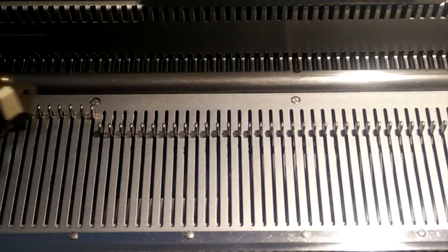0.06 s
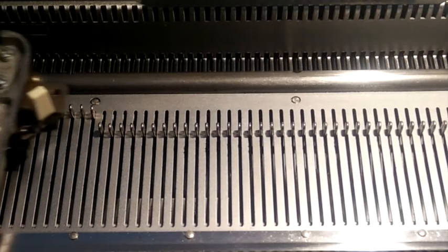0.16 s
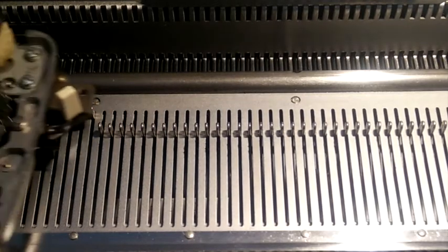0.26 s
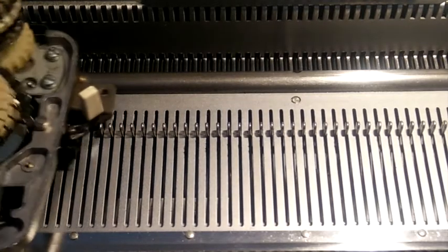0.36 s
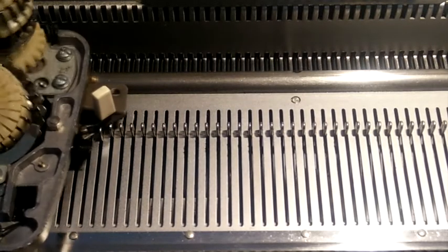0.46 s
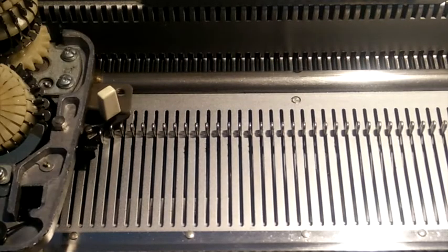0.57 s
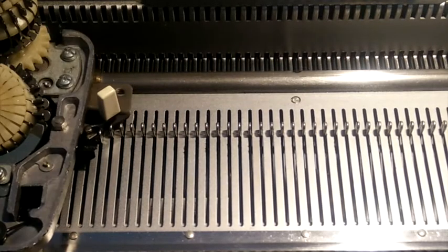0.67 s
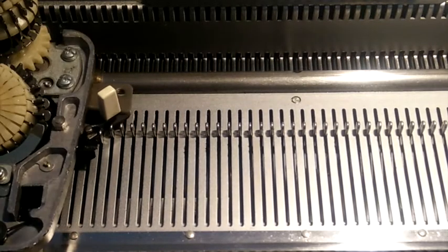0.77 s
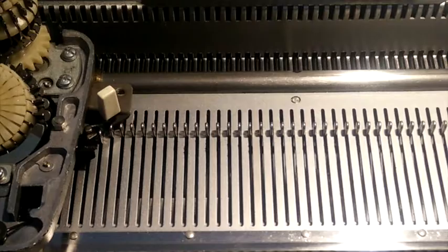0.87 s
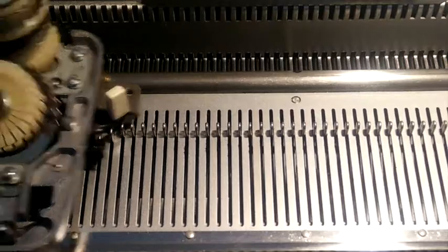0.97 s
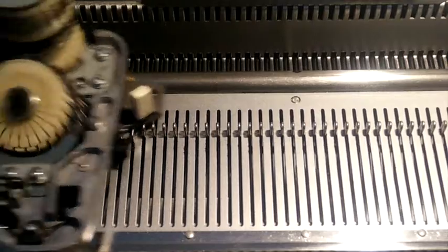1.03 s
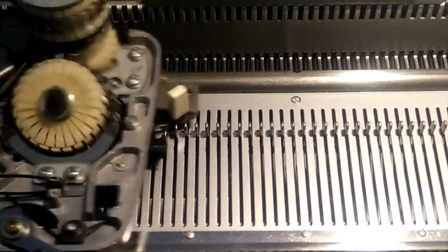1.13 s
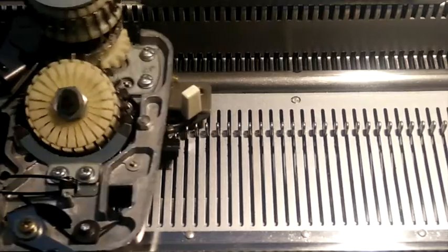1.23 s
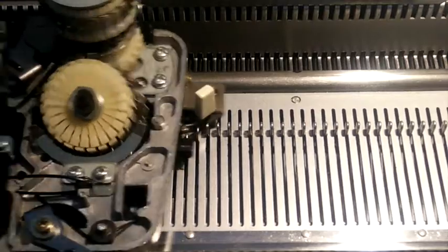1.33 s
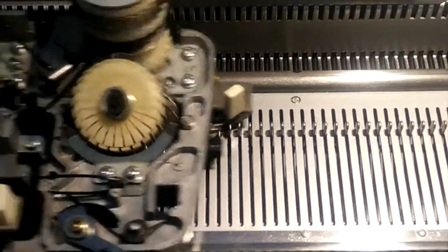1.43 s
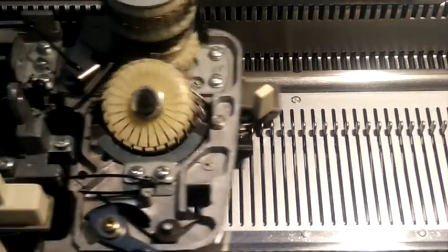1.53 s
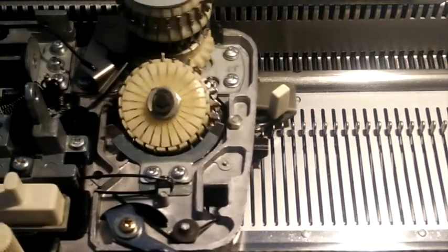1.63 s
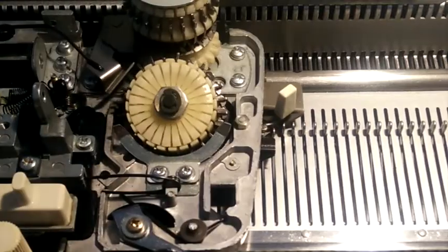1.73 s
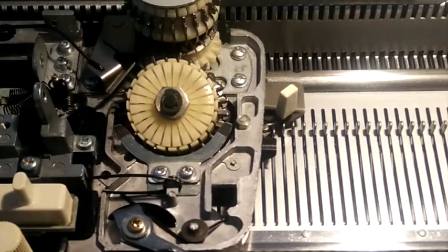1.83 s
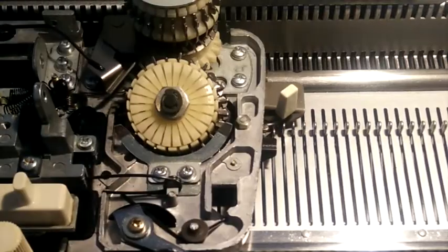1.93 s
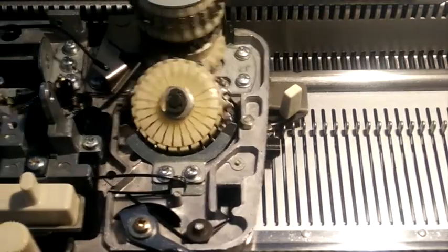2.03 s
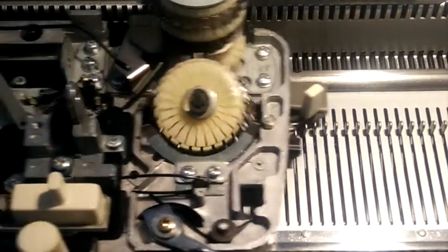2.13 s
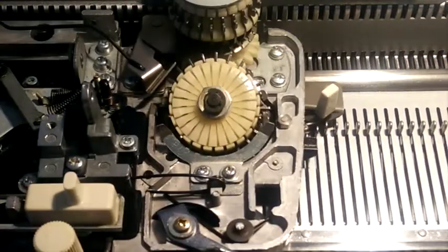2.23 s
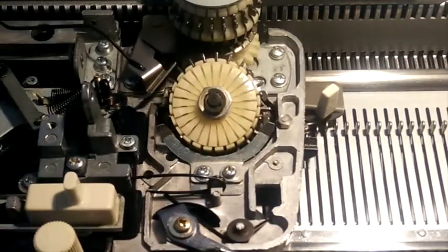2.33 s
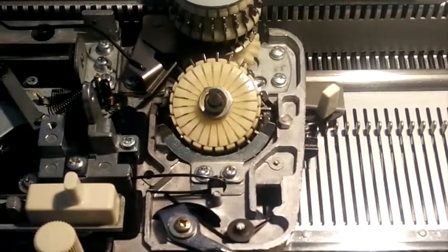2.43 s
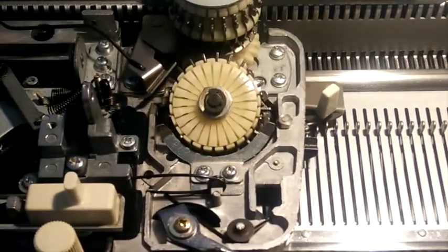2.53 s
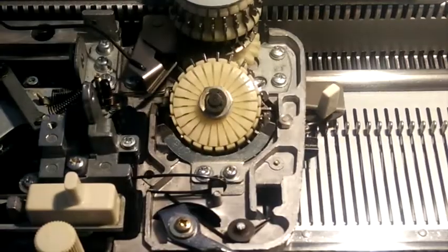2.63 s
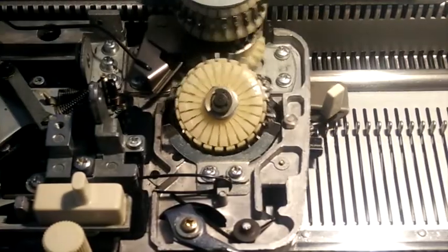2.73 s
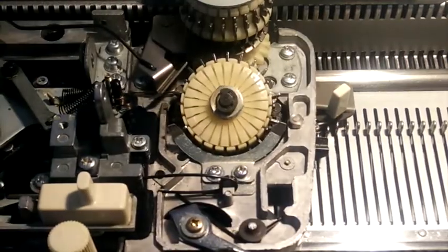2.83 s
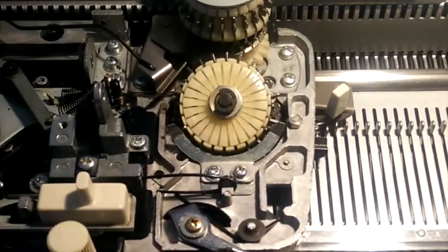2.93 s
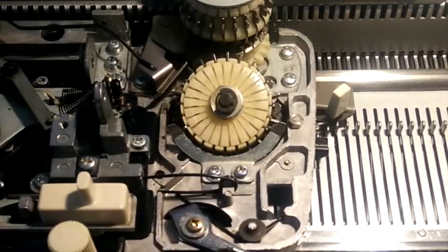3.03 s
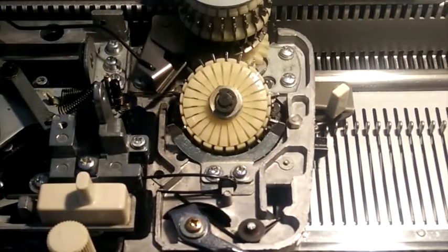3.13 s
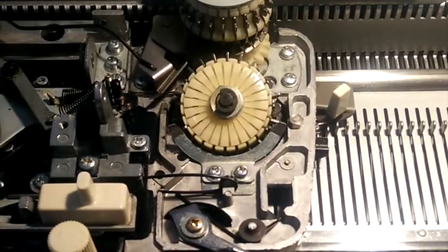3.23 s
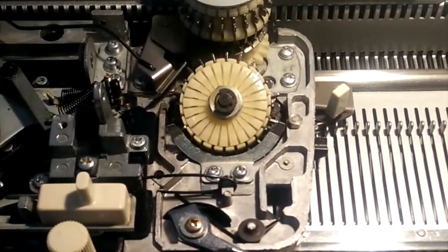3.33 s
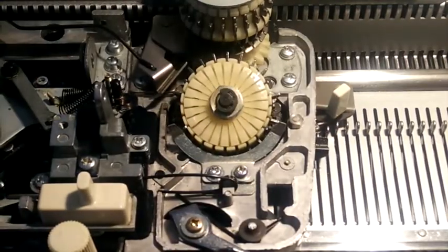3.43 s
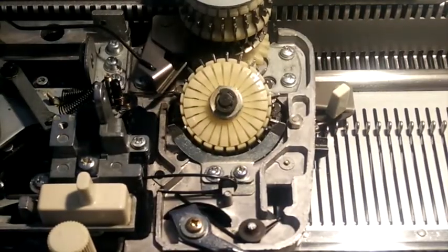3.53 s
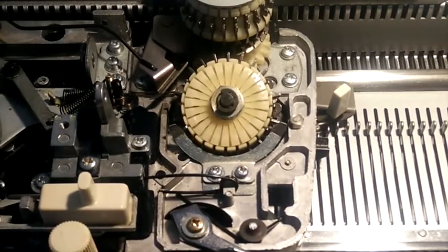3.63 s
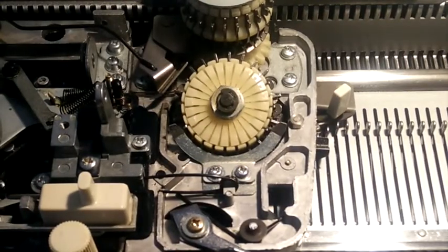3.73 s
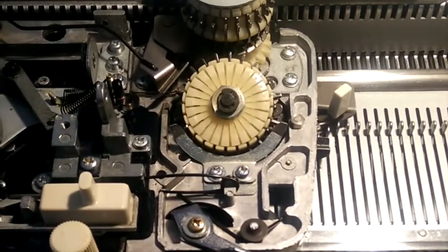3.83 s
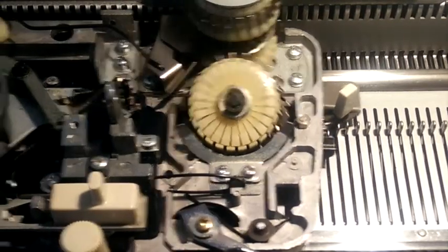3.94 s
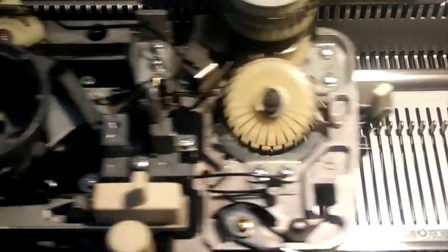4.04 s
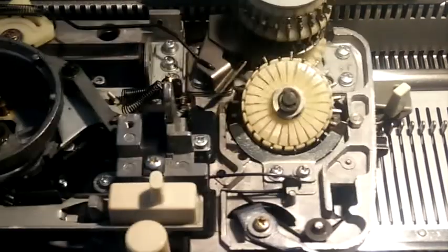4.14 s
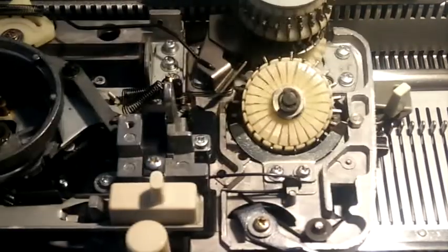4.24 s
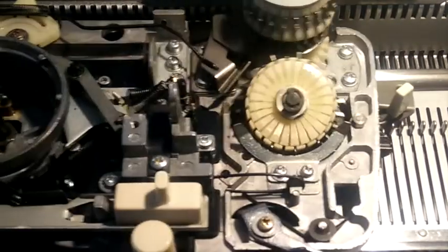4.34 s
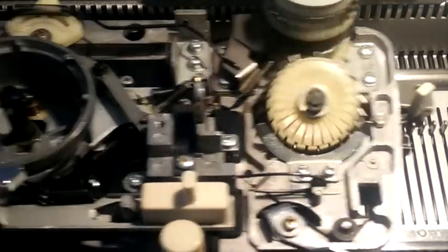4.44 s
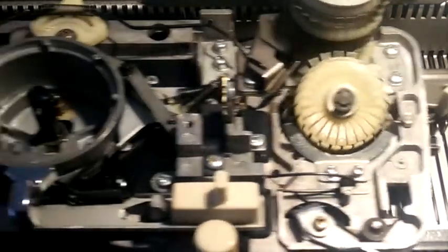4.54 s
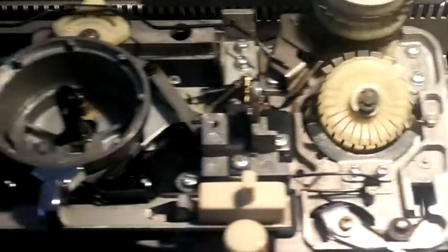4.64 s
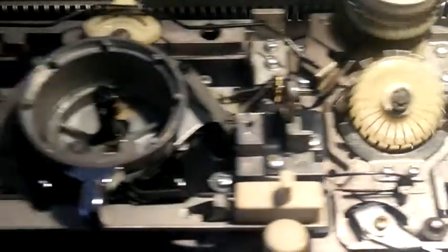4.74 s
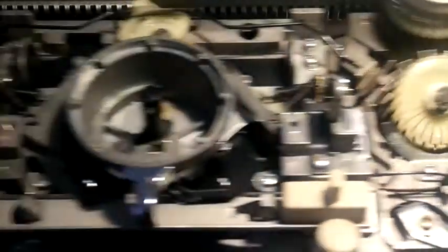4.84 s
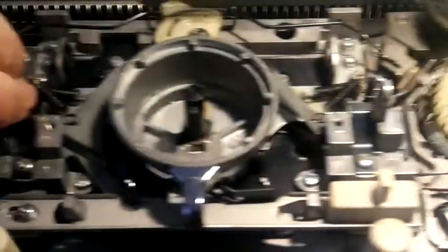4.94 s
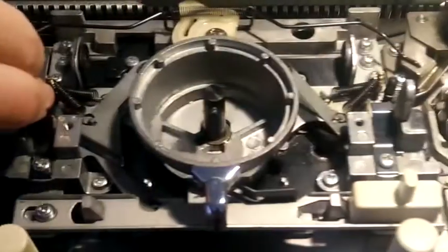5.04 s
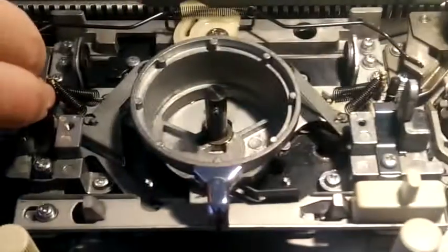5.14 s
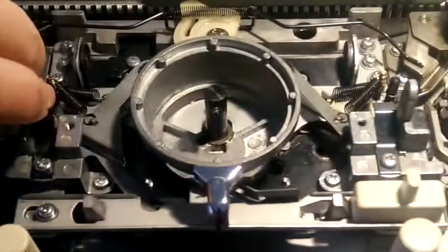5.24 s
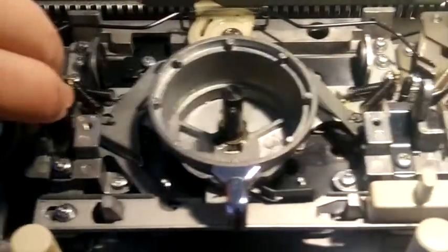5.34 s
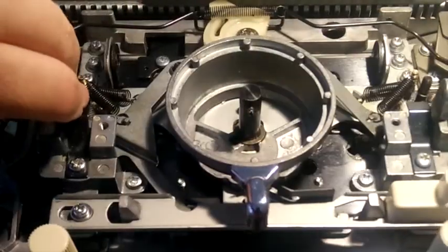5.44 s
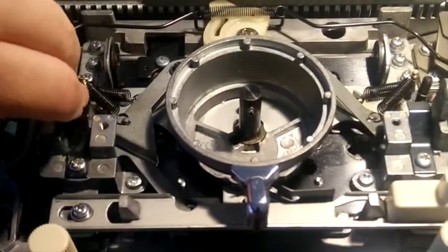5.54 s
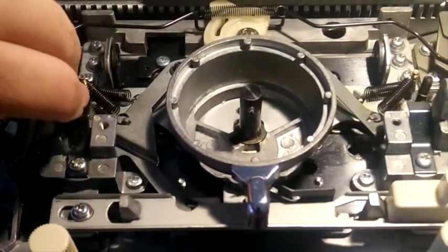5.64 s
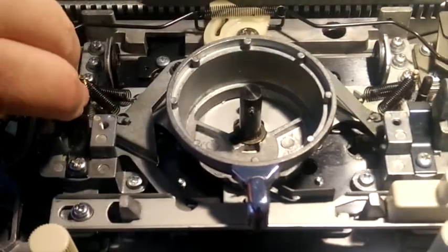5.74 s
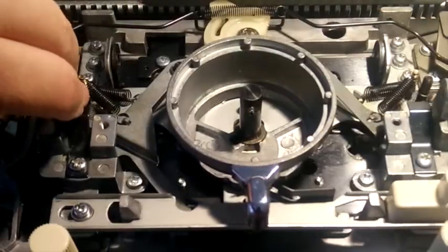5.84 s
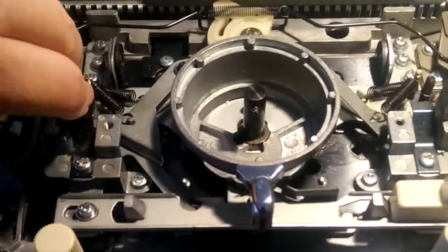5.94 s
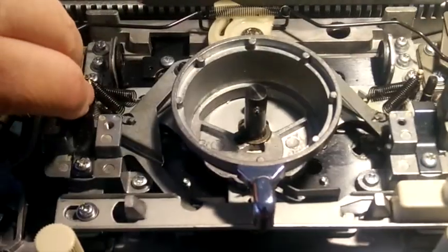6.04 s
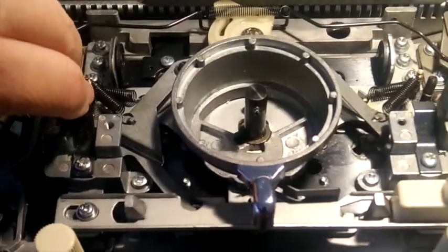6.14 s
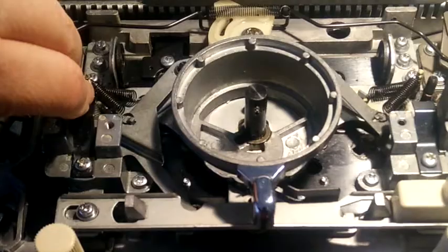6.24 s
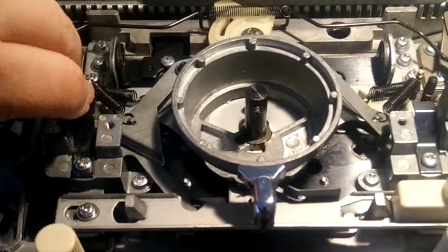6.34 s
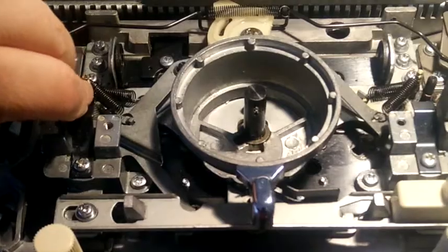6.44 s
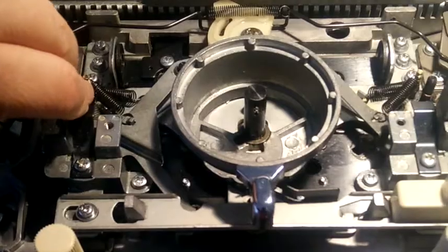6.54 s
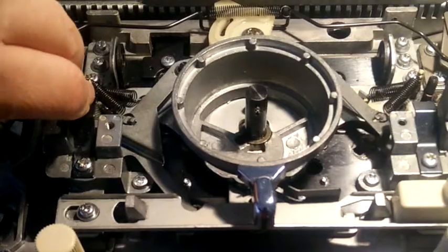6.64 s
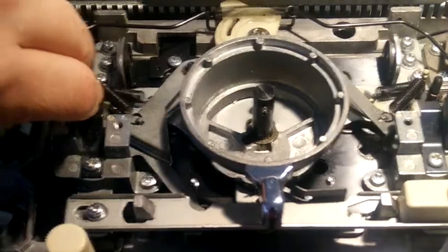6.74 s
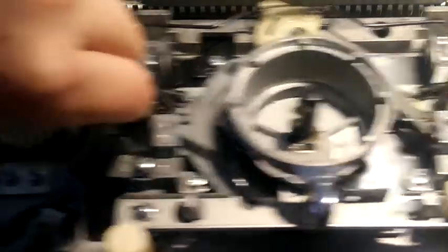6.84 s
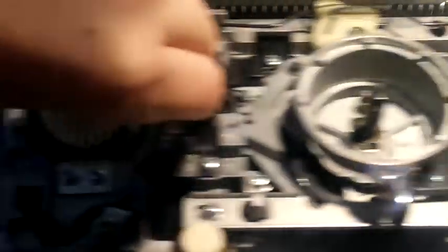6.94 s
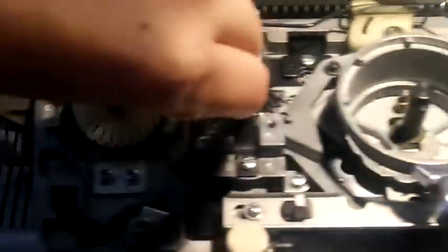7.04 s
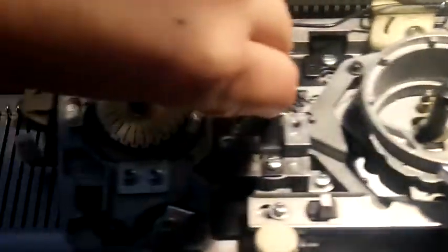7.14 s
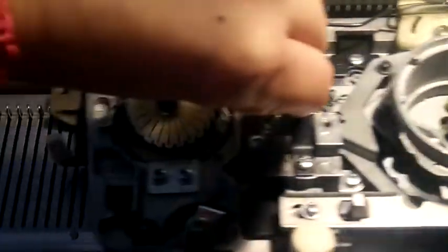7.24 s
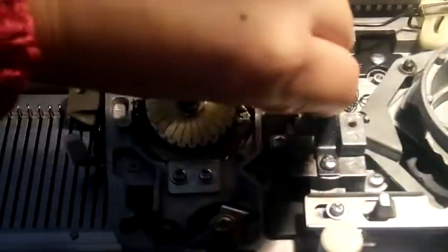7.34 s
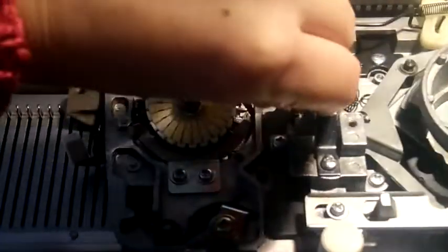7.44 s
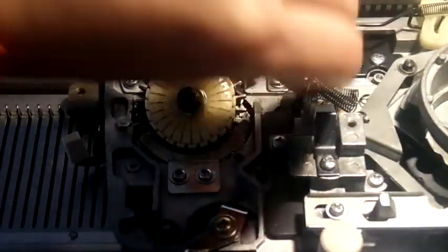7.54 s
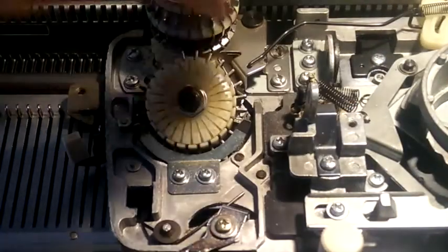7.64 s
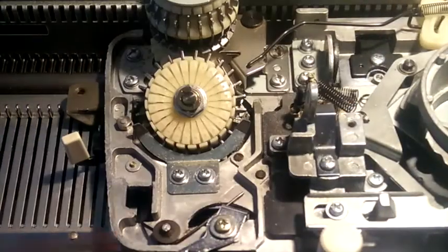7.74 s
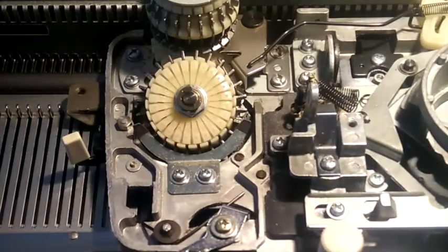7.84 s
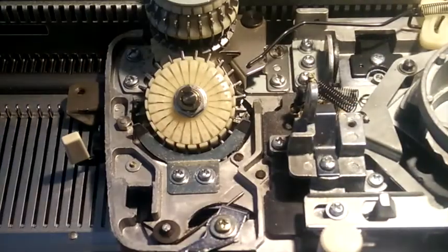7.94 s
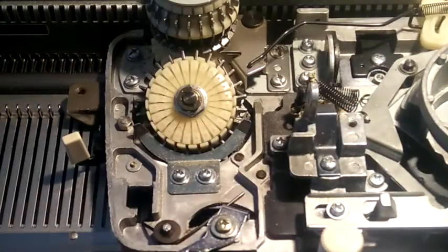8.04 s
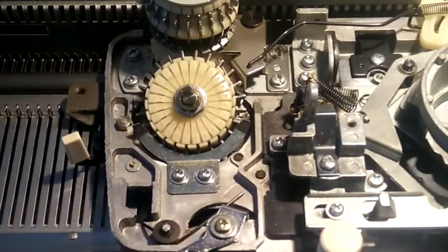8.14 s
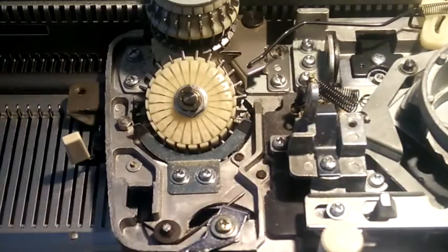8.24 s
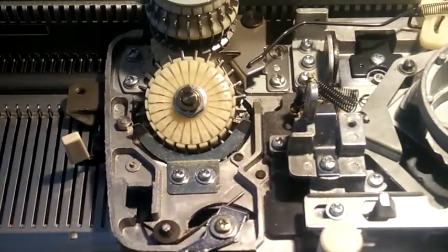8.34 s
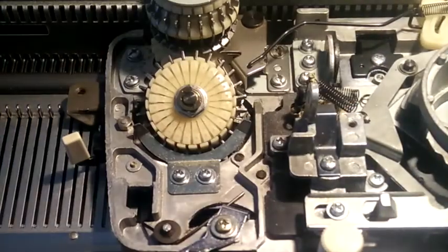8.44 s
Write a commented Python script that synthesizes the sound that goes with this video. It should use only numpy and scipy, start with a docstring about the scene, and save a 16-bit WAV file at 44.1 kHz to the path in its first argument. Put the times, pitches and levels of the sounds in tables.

```python
"""In a small room, a knitting machine carriage is pushed along its needle bed in fits and starts.
Its friction gates bursts of random needle contacts; sprung cams snap as short steel rings with cracks.
Knocks are decaying bursts of needle clatter; slow dragging groans as slips ring the casing.
Behind: a faint far engine (rising tones and rumble), a low drone, room hum and room tone.
Near the end, low sine thuds bump the hand-held recorder."""
import sys
import numpy as np
from scipy import signal
from scipy.fft import rfft, irfft, next_fast_len
from scipy.io import wavfile

SR = 44100
rng = np.random.default_rng(int(sys.argv[2]) if len(sys.argv) > 2 else 0)


def unload_wav(signal):
    """Save mono or channel-first audio to the path in sys.argv[1] as 16-bit WAV at rate SR, clipped to [-1, 1]."""
    wavfile.write(
        sys.argv[1],
        SR,
        np.round(np.clip(np.atleast_2d(signal).T, -1, 1) * 32767).astype(np.int16),
    )


N = 374409
T = np.arange(N) / SR


def from_db(db):
    """Decibels to amplitude gain."""
    return 10 ** (np.asarray(db) / 20)


def rms_one(x):
    """Scale to rms 1."""
    return x / np.sqrt(np.mean(x ** 2) + 1e-20)


def at_hz(points, hz):
    """Interpolate a table on a log-frequency axis."""
    known_hz, values = np.transpose(points)
    return np.interp(np.log(np.maximum(hz, 1)), np.log(known_hz), values)


def colour(x, spectrum):
    """Causal minimum-phase filter with the given spectrum, built by folding its cepstrum."""
    size = 4096
    gain = from_db(at_hz(spectrum, np.fft.rfftfreq(size, 1 / SR)))
    cepstrum = irfft(np.log(gain))
    cepstrum[1:size // 2] *= 2
    cepstrum[size // 2 + 1:] = 0
    impulse = irfft(np.exp(rfft(cepstrum)))
    filtered = signal.fftconvolve(np.atleast_2d(x), impulse[None], axes=1)
    return filtered[:, :x.shape[-1]].reshape(x.shape)


def drift(rate_hz):
    """Slow random control: normal draws at rate_hz, joined by straight lines."""
    return np.interp(T * rate_hz, np.arange(N // 40), rng.standard_normal(N // 40))


def resonance(x, hz, width_hz):
    """Two-pole resonator: a unit click starts a ring of height about 1."""
    r = np.exp(-np.pi * width_hz / SR)
    poles = [1, -2 * r * np.cos(2 * np.pi * hz / SR), r * r]
    return signal.lfilter([.5, 0, -.5], poles, x + 1e-18)


def add(track, s, sound):
    """Mix a sound into a track at time s."""
    i = max(int(s * SR), 0)
    track[..., i:i + sound.shape[-1]] += sound[..., :max(N - i, 0)]


FALL_DB = 20   # lost per fall time


def swell(start_s, end_s, rise_s, fall_s):
    """Gain that gathers from 0 to 1 at start, holds until end and decays exponentially."""
    rise = np.clip(1 - (start_s - T) / rise_s, 0, 1) ** 2
    return rise * from_db(-FALL_DB * np.clip((T - end_s) / fall_s, 0, 10))


def contacts(per_s, spread_db):
    """Random tiny collisions of very uneven size and either sign; rms 1."""
    out = np.zeros(N)
    when, size, sign = rng.random((int(per_s * N / SR), 3)).T
    height = from_db(spread_db * np.minimum(-np.log(size), 4))
    out[(when * N).astype(int)] = height * np.sign(sign - .5)
    return rms_one(out)


# left-right likeness of diffuse sound: (frequency [Hz], likeness [0-1])
STEREO_LIKENESS = [(100, 0.96), (1000, 0.35), (8000, .15)]


def diffuse(a, b):
    """Two unrelated sounds become a stereo pair, alike in the bass and apart in the treble."""
    size = next_fast_len(len(a))
    alike = np.clip(at_hz(STEREO_LIKENESS, np.fft.rfftfreq(size, 1 / SR)), 0, .99)
    mid = rfft(a, size) * np.sqrt((1 + alike) / 2)
    side = rfft(b, size) * np.sqrt((1 - alike) / 2)
    return irfft(np.array([mid + side, mid - side]), size)[:, :len(a)]


# steel chassis modes: (frequency [Hz], width [Hz], height over the broad sound [dB])
CHASSIS_MODES = [(332, 35, -0.5), (946, 34, -1.5), (1038.9, 31, -1), (1273, 88, -7.5), (2673, 45, -8.5),
                 (3086, 13, 6), (4512, 15, 3)]


def chassis(x):
    """Whatever shakes the machine also rings its chassis modes; rms 1."""
    rings = sum(from_db(db) * 2 * np.pi * width_hz / SR * resonance(x, hz, width_hz)
                for hz, width_hz, db in CHASSIS_MODES)
    return rms_one(x + rings)


def jingle(per_s=130, spread_db=2.0, width_hz=380, count=26):
    """Needles knock in their slots, each ringing for a millisecond or two at its own pitch."""
    pitches_hz = np.linspace(2800, 15800, count)
    return sum(resonance(contacts(per_s, spread_db), hz, width_hz) for hz in pitches_hz)


NEEDLES_PER_S, NEEDLE_TIMING_SPREAD = 38, .1   # spread in needle intervals
NEEDLE_TICK_DB, NEEDLE_TICK_SPREAD_DB = 17.5, 2   # re friction


def passing_needles(friction, count=400):
    """Needles leave the cam track at a nearly even rate, ticking as hard as the carriage rubs."""
    late, size = rng.standard_normal((count, 2)).T
    s = (np.arange(count) + NEEDLE_TIMING_SPREAD * late) / NEEDLES_PER_S
    friction_db = 20 * np.log10(np.interp(s, T, friction))
    return list(zip(s, friction_db + NEEDLE_TICK_DB + NEEDLE_TICK_SPREAD_DB * size))


# hand pushes on the carriage: (full speed from [s], until [s], friction before bed and needle gains [dB],
# brightness [dB], speeding up [s], slowing down [s])
HAND_PUSHES = [(0.199, 0.526, -83, 10.5, 0.46, 0.059), (1.08, 1.156, -54.5, 4.5, .07, 0.1262),
               (1.475, 1.557, -57, 2.5, 0.203, 0.178), (2.17, 2.221, -59.5, 3.5, 0.1147, 0.096),
               (2.78, 2.847, -74.5, -1, 0.097, 0.054), (4.038, 4.136, -50.5, 0.5, 0.096, 0.08),
               (4.485, 4.622, -52, 0, 0.15, .05), (4.715, 5.033, -48.5, 4.5, .12, 0.101),
               (5.36, 5.452, -51.5, 0.5, 0.0294, 0.069), (5.972, 5.989, -69, -8, 0.086, 0.055),
               (6.87, 7.009, -42.5, 4.5, 0.1071, 0.151), (7.24, 7.329, -51, 1, .16, 0.106)]
# single needles that catch and slip free: (time [s], level before tick_db [dB])
NEEDLE_SLIPS = [(0.1999, -45), (0.313, -43), (0.4276, -39), (0.5437, -42.5), (1.0334, -37), (1.137, -45),
                (1.3254, -40), (1.4025, -35), (1.534, -36.5), (1.6386, -35), (2.1102, -34), (2.1689, -28),
                (2.2109, -33), (2.8123, -45), (2.8305, -43), (4.4992, -23.5), (5.9825, -49), (5.9915, -44),
                (6.839, -33)]
# needle bed spectrum: (frequency [Hz], level [dB])
BED_SPECTRUM = [(60, -4), (170, -0.5), (520, -0.5), (800, 3.5), (1400, 1.5), (1800, -3.5), (3600, -4.5),
                (15000, -33)]
# needle spectrum: (frequency [Hz], level [dB])
NEEDLE_SPECTRUM = [(1500, -22.5), (3000, -10.5), (4400, -2.5), (5200, -4), (6600, 6.5), (7500, 3),
                   (9500, -5.5), (15500, -9)]


def sliding(bed_db=2, needles_db=4.5, lumpy_db=3.0, needle_lumpy_db=3.5,
            tick_db=-7, tick_s=0.0037, tick_bed_db=-14):
    """Needle butts jostle through the cam track, shaking the bed and jingling themselves."""
    friction, jingling, ticks = np.zeros((3, N))
    for start_s, end_s, db, bright_db, rise_s, fall_s in HAND_PUSHES:
        push = from_db(db) * swell(start_s, end_s, rise_s, fall_s)
        friction = np.maximum(friction, push)
        jingling = np.maximum(jingling, push * from_db(bright_db))
    tick_decay = np.exp(-T[:SR // 20] / tick_s)
    for s, db in list(NEEDLE_SLIPS) + passing_needles(friction):
        add(ticks, s, from_db(db + tick_db) * tick_decay)
    catching = drift(130)   # cams catch and free themselves
    bed = chassis(colour(diffuse(contacts(1500, 3.5), contacts(1500, 4.5)), BED_SPECTRUM))
    needles = chassis(colour(diffuse(jingle(), jingle()), NEEDLE_SPECTRUM))
    shaking = friction * from_db(bed_db + lumpy_db * catching)
    jostling = jingling * from_db(needles_db + needle_lumpy_db * catching)
    return (shaking + from_db(tick_bed_db) * ticks) * bed + (jostling + ticks) * needles


def snap(hz, sharp_db, width_hz=620, crack_db=-17, crack_s=0.00074, rattle_db=-30, rattle_s=.0045):
    """One steel contact: a short ring, a broad crack and a few milliseconds of rattle."""
    t = T[:SR // 40]
    noise = rng.standard_normal((3, len(t)))
    rattle_envelope = np.exp(-t / rattle_s) * (1 - np.exp(-t / crack_s))
    rattle = from_db(rattle_db) * noise[:2] * rattle_envelope
    ring = resonance((t == 0) + rattle, hz, width_hz)
    # band-pass: the ring takes a few cycles to build up
    ring = signal.sosfilt(signal.butter(1, [4600, 8400], "band", fs=SR, output="sos"), ring)
    burst = from_db(crack_db) * noise[2] * np.exp(-t / crack_s)
    return ring, from_db(sharp_db) * (burst + 1.4 * rattle)


# steel cams snap on needles: (time [s], level before ring gain and crack spectrum [dB], ring [Hz],
# crack sharpness [dB], left re right [dB])
CAM_SNAPS = [(1.7183, -7, 6390, 10, -2), (3.9963, -2.5, 6364, -2.5, -14), (4.0694, -13, 6000, 18, -2.5),
             (4.1308, -7, 6640, 12, 0.5), (4.4676, -5.5, 6500, 13, -5), (4.5542, -1, 6474, 0.5, -5.5),
             (4.6509, 0.5, 6500, -0.5, -5.5), (4.7375, 0.1, 6576, 0.5, -3.5), (4.7993, -1, 6304, 8, -8),
             (4.8539, -6, 6186, 12.5, -6.5), (4.9458, -15.5, 7200, 9, 6.5), (4.9505, -0.5, 6936, -3, -19),
             (4.9747, 3, 6280, -7.5, -1.5), (5.0054, -12, 6780, 4.5, 7.5), (5.019, -7, 6300, 8, -24),
             (5.0605, -0.5, 6270, -8, -3.5), (5.349, -7.5, 7010, 6.5, 1), (5.4123, 0, 6349, -8.5, -1.5),
             (6.9161, -12, 6730, 3.5, 9), (6.9366, 3.5, 5843, -13.5, -13), (6.9495, -11, 6660, 11, 7),
             (6.9725, -0.5, 6040, -9, -11.5), (6.9845, -9, 6450, -0.5, 7), (7.0129, -.5, 6140, -3, -4.5),
             (7.2349, -11, 6640, 12.5, 4.5), (7.3149, -8, 6290, 5, 0)]
# crack spectrum: (frequency [Hz], level [dB])
CRACK_SPECTRUM = [(300, -14.5), (1000, -14), (2000, -16.5), (3200, -6), (5000, -2.5), (8000, 6), (10500, 3),
                  (15500, 1)]
BOUNCE_S, BOUNCE_SPREAD, BOUNCE_DB = .0019, .2, -6   # median delay, log spread, re snap


def cams(ring_db=4):
    """Each sprung cam strikes a needle and bounces once."""
    rings, cracks = np.zeros((2, 2, N))
    for s, db, hz, sharp_db, pan_db in CAM_SNAPS:
        bounce_s = BOUNCE_S * np.exp(BOUNCE_SPREAD * rng.standard_normal())
        for when, level_db in ((s, db), (s + bounce_s, db + BOUNCE_DB)):
            ring, crack = snap(hz, sharp_db)
            gain = from_db([[level_db + pan_db], [level_db]])
            add(rings, when, gain * ring)
            add(cracks, when, gain * crack)
    return from_db(ring_db) * rings + colour(cracks, CRACK_SPECTRUM)


# knocks on the machine, mostly the carriage on its rail, at 5.963 s a hand: (time [s], level before low-pass
# [dB], ring-down t60 [s], low-pass [Hz])
MACHINE_KNOCKS = [(1.721, -31, 0.0854, 2520), (4.625, -13, 0.0575, 7980), (4.636, -16.5, 0.13, 5150),
                  (5.963, -38, 0.24, 600), (6.7731, -27.5, 0.1, 1700), (6.866, -25, 0.32, 3068)]
# knock spectrum: (frequency [Hz], level [dB])
KNOCK_SPECTRUM = [(60, -16), (180, -9.5), (340, -8), (830, 0), (1600, -7), (2600, -0.5), (3700, -5.5),
                  (5800, 1.5), (8500, 1.5), (15500, -9.5)]


def knocks():
    """Each knock sets the needle row clattering for a moment, low-passed to its own dullness."""
    clatter = chassis(colour(diffuse(contacts(6000, 3.2), contacts(6500, 2.4)), KNOCK_SPECTRUM))
    out, t = np.zeros((2, N)), T[:SR // 4]
    for s, db, t60_s, dull_hz in MACHINE_KNOCKS:
        burst = clatter[:, int(s * SR):][:, :len(t)] * from_db(db - 60 * t / t60_s)
        low_pass = signal.butter(1, dull_hz, fs=SR, output="sos")
        add(out, s, signal.sosfilt(low_pass, burst))
    return out


# slow drags: (from [s], until [s], level [dB])
CASING_GROANS = [(0, 0.342, -54.5), (1.083, 1.205, -50.5), (1.481, 1.564, -56)]
# plastic casing modes: (frequency [Hz], width [Hz], relative level [dB])
CASING_MODES = [(763.7, 15.7, -1), (609, 82, -2.5), (320.2, 81.3, -1.5), (189.83, 4.5, -4.5)]
GROAN_RISE_S, GROAN_FALL_S = 0.091, 0.164


def groan(soft_hz=1300):
    """Slow dragging: soft, uneven slips ring the plastic casing."""
    slips = signal.sosfilt(signal.butter(4, soft_hz, fs=SR, output="sos"), contacts(350, 2.1))
    body = sum(from_db(db) * np.sqrt(width_hz) * resonance(slips, hz, width_hz)
               for hz, width_hz, db in CASING_MODES)
    drag = sum(from_db(db) * swell(start_s, end_s, GROAN_RISE_S, GROAN_FALL_S)
               for start_s, end_s, db in CASING_GROANS)
    return drag * rms_one(body)


# reverberation: (frequency [Hz], t60 [s])
REVERB_T60 = [(200, 0.59), (3700, 0.44), (6200, 0.46), (7400, 0.27), (9000, 0.33), (15000, 0.39)]


def room(x, wet_db=-11, gap_s=0.0041, echo_s=0.0047, echo_db=-22):
    """One clear reflection and a diffuse tail that dies band by band."""
    t = T[:SR * 3 // 4]
    noise = rfft(diffuse(*rng.standard_normal((2, len(t)))))
    hz, centres_hz = np.fft.rfftfreq(len(t), 1 / SR), np.array(REVERB_T60)[:, 0]
    tail = 0
    for share, (_, t60_s) in zip(np.eye(len(centres_hz)), REVERB_T60):
        band = irfft(noise * np.interp(hz, centres_hz, share), len(t))
        tail = tail + band * from_db(-60 * t / t60_s)
    tail = tail * np.clip(t / gap_s - 1, 0, 1)
    response = from_db(wet_db) * tail / np.sqrt(np.sum(tail ** 2) / 2)
    response[:, int(echo_s * SR)] += from_db(echo_db)
    return signal.fftconvolve(x, response, axes=1)[:, :N]


# recorder bumps: (time [s], level before left/right gains [dB])
RECORDER_BUMPS = [(7.974, -42), (8.163, -39.5), (8.202, -41.5), (8.229, -40), (8.301, -36), (8.389, -39),
                  (8.468, -42)]


def bumps(hz=75, swell_s=0.0039):
    """Soft low thuds through the recorder's case, stronger on the left."""
    out, t = np.zeros(N), T[:SR // 10]
    envelope = t / swell_s * np.exp(1 - t / swell_s)
    for s, db in RECORDER_BUMPS:
        thud_hz = hz * rng.uniform(0.688, 1.103)
        add(out, s, from_db(db) * envelope * np.sin(2 * np.pi * thud_hz * t))
    return out * from_db([[4], [-9]])


# far engine pulls: (from [s], until [s], starting pitch [Hz], climb [Hz/s], rms level at the boom [dB])
FAR_ENGINE_PULLS = [(0.948, 3.101, 43.12, 24.8, -51), (5.907, 7.502, 62.34, 16, -57.5)]
ENGINE_RISE_S, ENGINE_FALL_S = .2, 0.83
BOOM_HZ, BOOM_WIDTH_HZ = 82.56, 12
RUMBLE_DB, RUMBLE_LOW_HZ, RUMBLE_HIGH_HZ = -18, 150.82, 467


def engine(second_db=-12, waver_db=5.5, wobble=0.0046):
    """Far engine: rumble, plus a note and second harmonic that climb, loudest through the boom."""
    band = signal.butter(2, [RUMBLE_LOW_HZ, RUMBLE_HIGH_HZ], "band", fs=SR, output="sos")
    noise = diffuse(*rng.standard_normal((2, N)))
    rumble = from_db(RUMBLE_DB) * rms_one(signal.sosfilt(band, noise))
    out = 0
    for start_s, end_s, start_hz, hz_per_s, db in FAR_ENGINE_PULLS:
        hz = start_hz + hz_per_s * (np.clip(T, start_s, end_s) - start_s)
        boom = 1 / np.hypot(1, 2 * (hz - BOOM_HZ) / BOOM_WIDTH_HZ)
        phase = 2 * np.pi * np.cumsum(hz * (1 + wobble * drift(7.2))) / SR
        tone = np.sin(phase) + from_db(second_db + waver_db * drift(26)) * np.sin(2 * phase)
        gain = from_db(db) * swell(start_s, end_s, ENGINE_RISE_S, ENGINE_FALL_S)
        out = out + gain * (boom * tone + rumble * (hz / hz.max()) ** 2)
    return out


# low drone swells: (from [s], until [s], pitch [Hz], rms level [dB])
DRONE_SWELLS = [(0, 0.147, 38.58, -65.5), (2.95, 3.535, 39.89, -60)]
DRONE_RISE_S, DRONE_FALL_S = 0.22, 0.76


def low_drone():
    """Steady low sines that swell twice."""
    return sum(from_db(db) * swell(start_s, end_s, DRONE_RISE_S, DRONE_FALL_S) * np.sin(2 * np.pi * hz * T)
               for start_s, end_s, hz, db in DRONE_SWELLS)


# room hum: (frequency [Hz], rms level before wavering [dB])
HUM_TONES = [(197, -71), (251, -87), (322, -76), (398, -81.5)]


def room_hum(waver_db=1.5, wobble_rad=0.24):
    """Sines wavering slightly in level and phase."""
    return sum(from_db(db + waver_db * drift(17)) * np.sin(2 * np.pi * hz * T + wobble_rad * drift(26))
               for hz, db in HUM_TONES)


# room tone: ([(frequency [Hz], relative level [dB]), ...], overall rms level [dB])
AIR_SPECTRUM, AIR_DB = [(28, -30.5), (42, -14), (95, -5.5), (150, -14.5), (310, -19.5), (640, -24.5),
                        (1300, -32), (3800, -37.5), (7000, -35.5), (9500, -44.5), (16000, -41)], -62.5


def room_tone():
    """Diffuse coloured noise."""
    return from_db(AIR_DB) * rms_one(colour(diffuse(*rng.standard_normal((2, N))), AIR_SPECTRUM))


def background():
    """Engine, drone and hum, scaled from sine rms to peak, over room tone."""
    return np.sqrt(2) * (engine() + low_drone() + room_hum()) + room_tone()


# shaded left microphone: (frequency [Hz], level [dB])
LEFT_SHADE = [(100, -3.5), (400, 1), (800, -1.5), (1300, -2), (4500, 1), (5500, 3), (6500, -18.5),
              (8000, -15)]
LEFT_LAG_S = 0.0002459


def scene():
    """Machine in its room, later and duller on the left, over the background and bumps."""
    machine = sliding() + cams() + knocks() + groan()
    left, right = machine + room(machine)
    left = np.roll(colour(left, LEFT_SHADE), int(LEFT_LAG_S * SR))
    return np.array([left, right]) + bumps() + background()


CUTOFF_HZ = 16200


def record(dry):
    """High-pass the deepest bass, clip peaks beyond 0.95 and cut the top."""
    x = signal.sosfilt(signal.butter(8, 32, "high", fs=SR, output="sos"), dry)
    top_cut = signal.ellip(10, .2, 70, CUTOFF_HZ, fs=SR, output="sos")
    return signal.sosfilt(top_cut, np.clip(x, -.95, .95))


dry = scene()
out = record(dry)
unload_wav(out)
```